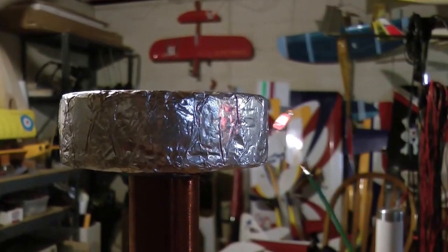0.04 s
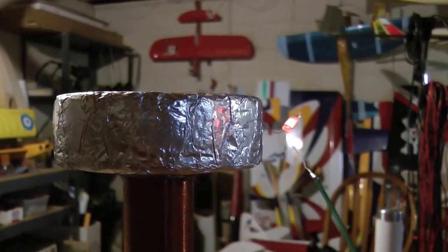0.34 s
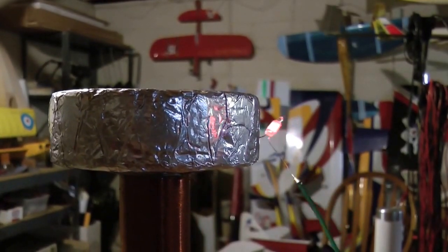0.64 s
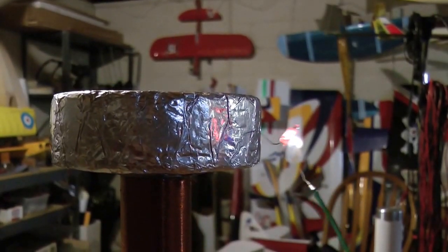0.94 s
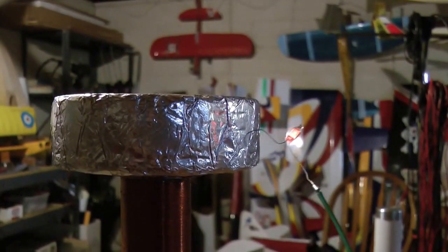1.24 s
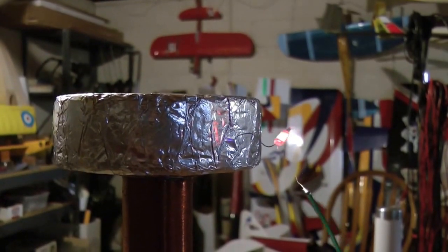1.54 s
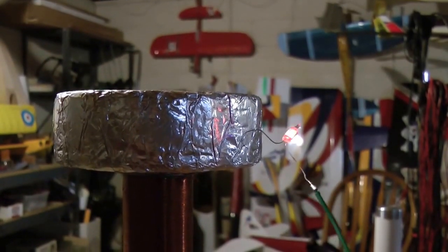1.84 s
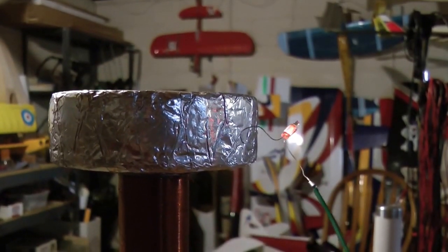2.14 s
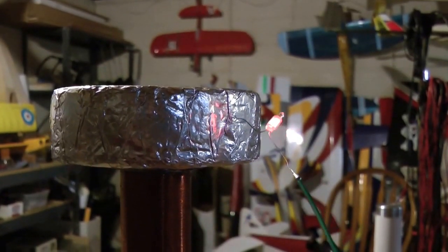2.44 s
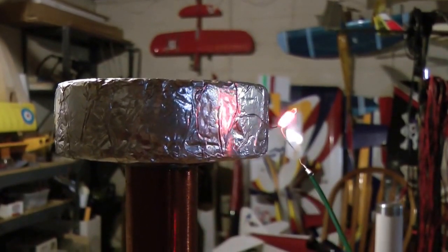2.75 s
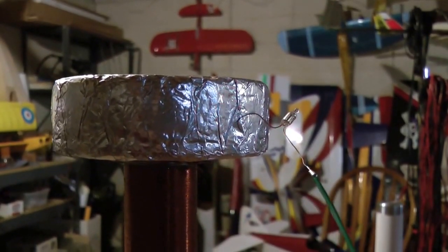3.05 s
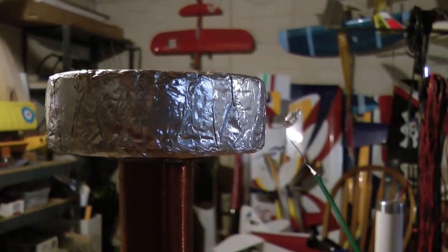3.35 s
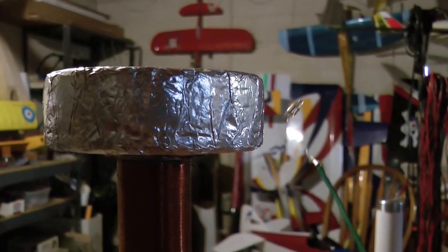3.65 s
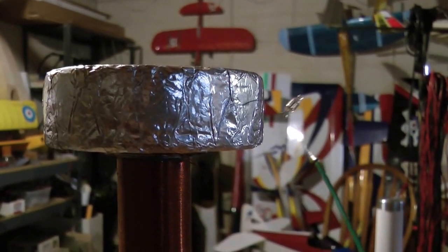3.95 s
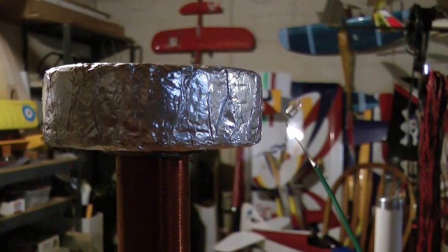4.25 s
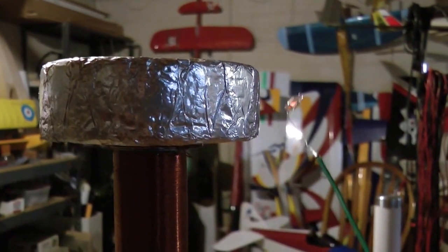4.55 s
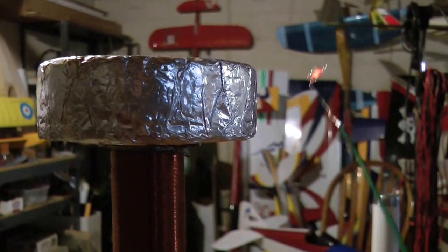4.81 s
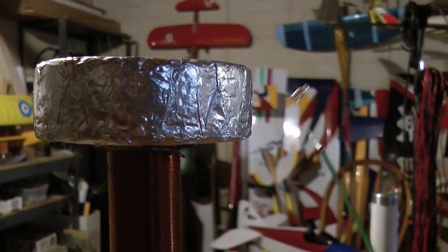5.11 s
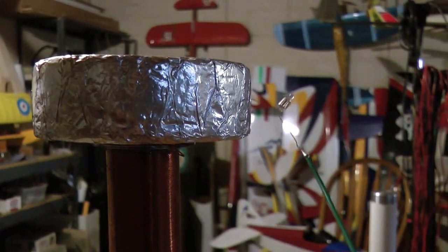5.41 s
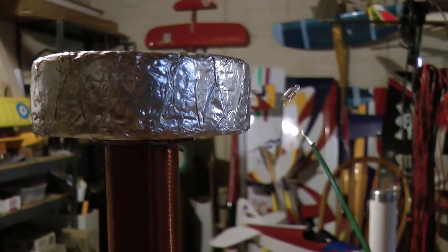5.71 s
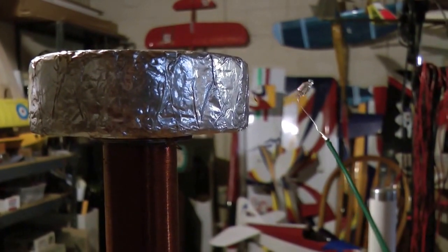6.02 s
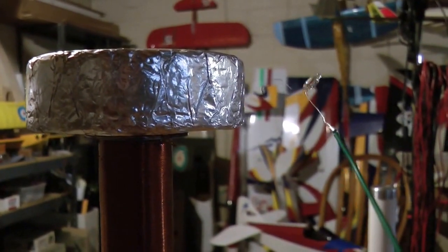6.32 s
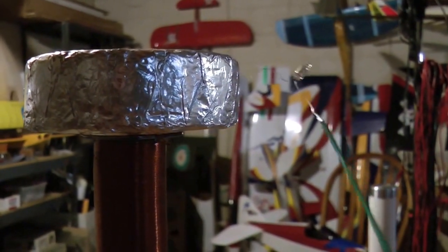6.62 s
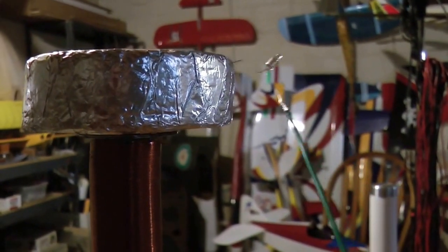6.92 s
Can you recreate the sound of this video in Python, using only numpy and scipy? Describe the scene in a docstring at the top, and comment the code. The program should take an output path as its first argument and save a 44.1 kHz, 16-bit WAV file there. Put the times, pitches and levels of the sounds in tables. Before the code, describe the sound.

Harsh, continuous electric buzzing and crackling from a high-voltage coil sparking to a small lamp, broken by two sharp clicks.

```python
"""Workshop: a vibrator ignition coil buzzes, firing a small spark gap that feeds a high-voltage coil.
An arc sizzles and sings from the coil top to a small lamp for 3 s; the gap then rasps on alone,
bar one brief restrike. Each stroke of the points breaks the air down in a cluster of snaps.
Two flurries of discharges enter the microphone's amplifier as clicks. Hands rub and nudge the
camera; low room noise lies underneath."""
import sys
import numpy as np
from scipy import signal
from scipy.fft import rfft, irfft
from scipy.io import wavfile
from scipy.ndimage import uniform_filter1d

SR = 44100
rng = np.random.default_rng(int(sys.argv[2]) if len(sys.argv) > 2 else 0)


def wav_record(signal):
    """Record a signal, one row per channel, as 16-bit PCM in the file named by sys.argv[1]."""
    frames = np.transpose(np.atleast_2d(signal))
    bounded = np.clip(frames, -1, 1)
    # unit amplitude maps onto the largest positive 16-bit level
    quanta = np.round(bounded * 32767).astype(np.int16)
    wavfile.write(sys.argv[1], SR, quanta)


N = 307377

# broad spectra of gap snaps and arc snaps: f/Hz, relative level/dB
GAP_SPECTRUM = [(30, -33), (150, -22.5), (300, -14.5), (500, -19.5), (1200, -19.5), (2500, -5.5),
                (3600, -2), (5500, 0.67), (7500, 0.4), (10300, 1), (11300, -4), (13200, -2.5), (13800, -9),
                (15700, -21)]
ARC_SPECTRUM = [(30, -54), (150, -47), (300, -28.5), (500, -21.5), (1200, -19.5), (2500, -5.5),
                (3600, -2.5), (5500, -2), (7500, -0.1), (10500, 1.5), (11900, -4.5), (13100, -1.5),
                (14000, -9), (15700, -18)]
# electrode, coil box and bench resonances excited by each: f/Hz, width/Hz, lift/dB
GAP_MODES = [(617, 121, 14.9), (818, 69, 13.5), (993, 93, 14.3), (1064, 42, 9.5), (1244, 80, 9.9),
             (1387, 93, 10.1), (1571, 120, 19.2), (1755, 80, 6.8), (2068, 160, 9.8), (2274, 67, 6.1),
             (2404, 29, 6.7), (2569, 57, 5.0), (2740, 75, 9.2), (2966, 110, 8.0), (3158, 39, 4.7),
             (3889, 97, 2.8), (4190, 340, 10.6), (4466, 153, 5.4), (4725, 78, 5.7), (5363, 28, 6.0),
             (6191, 160, 7.1), (6428, 190, 12.3), (6618, 85, 10.0), (6785, 57, 7.3), (7070, 33, 4.8),
             (7428, 240, 2.5), (8475, 72, 8.4), (8628, 240, 6.4), (9655, 70, 4.7), (13242, 48, 9.0)]
ARC_MODES = [(335, 45, 19.5), (675, 63, 18.0), (1031, 120, 18.0), (1260, 103, 11.7), (1385, 73, 18.0),
             (2040, 140, 6.3), (2325, 53, 7.3), (2776, 47, 6.3), (2871, 20, 8.2), (4040, 166, 9.6),
             (4295, 81, 9.4), (4660, 380, 5.2), (6028, 62, 6.5), (6530, 400, 6.7), (7194, 120, 0.6),
             (8596, 237, 7.2), (12770, 600, 1.8), (15481, 515, 8.2)]
# arcs to the lamp: strike t/s, out t/s, level/dB
ARC_BURNS = [(-.05, 2.98, -22.5), (4.75, 4.89, -25)]
# points catching well or faltering: centre t/s, length/s, level change/dB
POINT_SPUTTERS = [(0.089, 0.07, -2.5), (0.222, 0.24, -1.5), (.88, .06, 1), (.925, 0.045, -1.5),
                  (1.335, 0.22, -1.3), (1.66, 0.28, 0.5), (2.132, .06, -2.5), (2.266, .06, -2),
                  (3.553, 0.036, 2.8), (3.605, .07, -2.5), (4.303, 0.23, -0.4)]
# swells of the arc's singing: centre t/s, level/dB
SING_SWELLS = [(.12, -41), (.45, -38), (.79, -39), (1.05, -40), (1.28, -36), (4.82, -52)]
# resonances of the singing arc and of the humming coil box: f/Hz, width/Hz, lift/dB
SING_MODE = [(1379.6, 56, 45.5)]
BOX_MODES = [(171, 73, 27), (249.4, 63, 31.5)]
# dull knock driving those resonances: f/Hz, relative level/dB
DRIVE_SPECTRUM = [(30, 0), (600, 3), (15000, -26)]
# room decay: f/Hz, T60/s
ROOM_DECAY = [(200, 0.23), (2000, 0.43), (6000, 0.7), (15000, 0.066)]
# left-right likeness of reflections: f/Hz, correlation/1
ROOM_COHERENCE = [(100, 0.27), (700, 0.63), (2500, 0.61), (4500, 0.77), (9000, 0.88), (15000, 0.62)]
# stereo tilt: f/Hz, left minus right level/dB
ROOM_BALANCE = [(200, 0.5), (700, 0.5), (1400, -1.1), (2500, 0.5), (4500, -0.3), (9000, -0.3), (13000, 1)]
# room murmur: f/Hz, relative level/dB
MURMUR_SPECTRUM = [(10, -1.5), (30, 2), (60, -2), (120, -3), (165, -8), (200, -12), (240, -7), (300, -23),
                   (600, -29), (3000, -50)]
# discharges picked up by the amplifier: t/s, step level/dB
DISCHARGES = [(0.0441, -10.5), (.0500, -4.5), (.0834, -22), (.0988, -5.5), (2.5770, -20), (2.585, -18),
              (2.5968, -23), (2.602, -14), (2.6180, -10), (2.6213, -11.5), (2.6330, -4), (2.6858, -27),
              (2.6992, -19.5)]
# hand knocks, rubs and ticks on camera and probe: t/s, level/dB, length/s, f/Hz
HAND_CONTACTS = [(.68, -53, 0.08, 110), (1.73, -54, 0.069, 42), (2.78, -55, .2, 44.8),
                 (4.017, -54, .09, 50), (4.112, -35, 0.014, 250), (4.122, -36, 0.0215, 255),
                 (4.113, -48.5, 0.48, 244), (5.165, -35.5, 0.024, 1850)]

GAP_DB, GAP_SAG_DB = -23.5, -1.2  # a lit arc draws power from the gap
ARC_RISE_S, ARC_FALL_S, THIN_S, THIN_DB = 0.04, 0.053, 0.67, -3
CORONA_DB = -36  # faint sizzle, arc lit or not
SING_SWELL_S, SING_STEADY_DB = 0.23, -63
EDGE_HZ, TAPS = 15900, 8192


def amp(db):
    """dB to gain."""
    return 10 ** (np.asarray(db) / 20)


def unit_rms(x):
    """Scale to rms 1."""
    return x / np.sqrt(np.mean(x ** 2) + 1e-20)


def lookup(table, hz):
    """Interpolate a table over log frequency."""
    table_hz, value = np.transpose(table)
    return np.interp(np.log(hz + 1), np.log(table_hz), value)


def wander(top_hz):
    """Random drift, rms 1, from a few Hz to top_hz."""
    hz = np.fft.rfftfreq(N, 1 / SR)
    band = hz ** 2 / (hz ** 2 + 30) / (1 + (hz / top_hz) ** 2)
    return unit_rms(irfft(rfft(rng.standard_normal(N)) * band, N))


def swell(centre_s, length_s):
    """Raised-cosine bump, peak 1."""
    return np.cos(np.pi * np.clip((np.arange(N) / SR - centre_s) / length_s, -.5, .5)) ** 2


def colour(x, spectrum, modes=()):
    """Minimum-phase filter: broad spectrum plus resonances."""
    hz = np.fft.rfftfreq(TAPS, 1 / SR)
    peaks_db = sum(db / (1 + (2 * (hz - mode_hz) / width_hz) ** 2) for mode_hz, width_hz, db in modes)
    db = lookup(spectrum, hz) + peaks_db
    log_gain = np.log(amp(np.r_[db, db[-2:0:-1]]))
    response = np.fft.ifft(np.exp(np.conj(signal.hilbert(log_gain)))).real[:TAPS // 2]
    return signal.oaconvolve(np.atleast_2d(x), response[None], axes=1)[:, :N]


def vibrator_points(rate_hz=146, drift=.13, chatter=.13):
    """Opening times/s of the points: a springy reed, uneven from stroke to stroke."""
    cycles = np.cumsum(rate_hz * (1 + drift * wander(14))) / SR
    slip = rng.standard_normal(N)
    opens = np.flatnonzero(np.diff(np.floor(cycles), prepend=-1) > 0)
    return opens / SR + chatter * slip[:len(opens)] / rate_hz


def sparks(strokes_s, scatter_s, stroke_db, spread_db, fizz_share, fizz_s, count):
    """Air breaks down several times as each stroke's voltage swells and sinks; fizz wraps each snap."""
    lag, size, strength = np.clip(rng.standard_normal((3, TAPS, count))[:, :len(strokes_s)], -2, 2)
    snap_s = strokes_s[:, None] + scatter_s * lag
    heights = amp(spread_db * size + stroke_db * strength[:, :1])
    snaps = np.bincount((snap_s * SR).astype(int).ravel() % N, heights.ravel(), N)
    window = np.exp(-(np.arange(-TAPS // 16, TAPS // 16) / SR / fizz_s) ** 2)
    fizz = np.sqrt(abs(signal.oaconvolve(snaps ** 2, window, "same"))) * rng.standard_normal(N)
    return np.sqrt(1 - fizz_share) * unit_rms(snaps - snaps.mean()) + np.sqrt(fizz_share) * unit_rms(fizz)


def arc_power():
    """Each arc strikes fast, burns, thins and goes out."""
    t, power = np.arange(N) / SR, np.zeros(N)
    for strike_s, out_s, db in ARC_BURNS:
        burning = np.clip((t - strike_s) / ARC_RISE_S, 0, 1) * np.clip((out_s - t) / ARC_FALL_S, 0, 1)
        thinning = np.clip(1 - (out_s - t) / THIN_S, 0, 1)
        power += burning * amp(db + THIN_DB * thinning) ** 2
    return power


def arc_singing(arc, lit):
    """Arc snaps drive one resonance: swells over a faint steady ring."""
    swells = sum(amp(db) * swell(centre_s, SING_SWELL_S) for centre_s, db in SING_SWELLS)
    return (amp(SING_STEADY_DB) * lit + swells) * unit_rms(colour(arc, DRIVE_SPECTRUM, SING_MODE))


def box_hum(gap, gap_share, full_db=-57):
    """The points shake the coil box; hum follows the gap's share of the power."""
    return amp(full_db) * gap_share * unit_rms(colour(gap, DRIVE_SPECTRUM, BOX_MODES))


def room_response(near_db=-3, near_decay_s=0.007, tail_db=-1):
    """Direct sound, quick bench reflections, short tail of a cluttered room."""
    hz, t, (left, other) = signal.stft(rng.standard_normal((2, SR // 2)), SR, nperseg=256)
    coherence = np.clip(lookup(ROOM_COHERENCE, hz), 0, 1)[:, None]
    pair = np.array([left, coherence * left + np.sqrt(1 - coherence ** 2) * other])
    decay = np.exp(-np.log(1000) * t / lookup(ROOM_DECAY, hz)[:, None])
    tail = signal.istft(pair * decay, SR, nperseg=256)[1]
    near = signal.istft(pair, SR, nperseg=256)[1][:, SR // 4:]
    t = np.arange(tail.shape[1]) / SR
    near_t = t[:near.shape[1]]
    tail *= np.clip(t / 0.008 - 1, 0, 1)
    near *= np.exp(-near_t / near_decay_s) * (near_t > .0005)
    response = amp(tail_db) * tail / np.linalg.norm(tail[0])
    response[:, :len(near_t)] += amp(near_db) * near / np.linalg.norm(near[0])
    response[:, 0] += 1
    return response


def workshop(x):
    """Short reverberation, equalised flat so spark resonances stay clear; treble keeps a fine ripple."""
    response = room_response()
    transfer, hz = rfft(response), np.fft.rfftfreq(response.shape[1], 1 / SR)
    power = (abs(transfer) ** 2).mean(0)
    ripple = lookup([(1800, 0.33), (6000, 0.62)], hz)
    transfer /= np.sqrt((1 - ripple) * uniform_filter1d(power, 11) + ripple * uniform_filter1d(power, 121))
    transfer *= amp(lookup(ROOM_BALANCE, hz) * np.array([[.5], [-.5]]))
    # circular convolution: the room is already sounding at t = 0
    return irfft(rfft(x, N) * rfft(irfft(transfer)[:, :SR // 4], N), N)


def moving_path(x, depth_db=0.7):
    """The spark path moves, so each band flares and fades on its own."""
    bands = signal.stft(x, SR, nperseg=256)[2]
    flares = uniform_filter1d(rng.standard_normal(bands.shape[1:]), size=9, axis=0)
    flares = uniform_filter1d(flares, size=12, axis=1)
    flares -= uniform_filter1d(flares, size=45, axis=0)  # flares cancel across frequency
    return signal.istft(bands * amp(depth_db * unit_rms(flares)), SR, nperseg=256)[1][:, :N]


def ignition_coil(gap_flutter_db=0.5, arc_flutter_db=1.0):
    """The points fire gap and arc together; both sputter as the air heats and clears."""
    strokes_s = vibrator_points()
    gap = sparks(strokes_s, scatter_s=.001, stroke_db=.4, spread_db=2,
                 fizz_share=.63, fizz_s=.0017, count=6)
    arc = sparks(strokes_s, scatter_s=.0025, stroke_db=.6, spread_db=2,
                 fizz_share=.42, fizz_s=.0013, count=9)
    burn_power = arc_power()
    lit = burn_power / burn_power.max()
    gap_power = amp(GAP_DB + GAP_SAG_DB * lit) ** 2
    power = gap_power + burn_power + amp(CORONA_DB) ** 2
    gap_share = gap_power / power
    sputter = amp(sum(db * swell(centre_s, length_s) for centre_s, length_s, db in POINT_SPUTTERS))
    rasp = workshop(colour(gap * amp(gap_flutter_db * wander(30)), GAP_SPECTRUM, GAP_MODES))
    sizzle = workshop(colour(arc * amp(arc_flutter_db * wander(34)), ARC_SPECTRUM, ARC_MODES))
    rasp = np.sqrt(gap_share) * unit_rms(rasp) * amp([[.45], [-.45]])
    sizzle = np.sqrt(1 - gap_share) * unit_rms(sizzle) * amp([[.15], [-.15]])
    buzz = unit_rms(moving_path(rasp + sizzle)) * np.sqrt(power) * sputter
    return buzz + arc_singing(arc, lit) + box_hum(gap, gap_share)


def room_murmur(level_db=-57, stereo_spread=1.3):
    """Low room noise, partly common to both channels."""
    noise = rng.standard_normal(N) + stereo_spread * rng.standard_normal((2, N))
    return amp(level_db) * unit_rms(colour(noise, MURMUR_SPECTRUM))


def amplifier_clicks(corner_hz=52, damping=0.88, coupling_hz=20, top_hz=3800):
    """Each discharge is a voltage step; the amplifier's bass cut leaves a spike and slow undershoot."""
    at_s, db = np.transpose(DISCHARGES)
    steps = np.cumsum(np.bincount(np.round(at_s * SR).astype(int), amp(db), N))
    omega = 2 * np.pi * corner_hz
    bass_cut = signal.bilinear([1, 0, 0], [1, 2 * damping * omega, omega ** 2], SR)
    spikes = signal.lfilter(*bass_cut, steps)
    spikes = signal.lfilter(*signal.butter(1, coupling_hz, "high", fs=SR), spikes)
    return amp([[-.2], [.2]]) * signal.lfilter(*signal.butter(1, top_hz, fs=SR), spikes)


def handling():
    """Dull rubs and knocks carried through the camera body, plus a light tick."""
    t, out = np.arange(N) / SR, np.zeros(N)
    for start_s, db, length_s, hz in HAND_CONTACTS:
        band = signal.butter(2, [hz * 0.59, hz * 1.32], "band", fs=SR, output="sos")
        body = unit_rms(signal.sosfilt(band, rng.standard_normal(N)))
        out += amp(db) * np.sin(np.pi * np.clip((t - start_s) / length_s, 0, 1)) * body
    return out


def scene():
    """Sparks, electrical clicks, handling, room noise."""
    return ignition_coil() + amplifier_clicks() + handling() + room_murmur()


def record(dry):
    """Steep low-pass at EDGE_HZ."""
    low_pass = signal.firwin(511, EDGE_HZ, window=("kaiser", 9), fs=SR)
    return signal.oaconvolve(dry, low_pass[None], "same")


dry = scene()
out = record(dry)
wav_record(out)
```